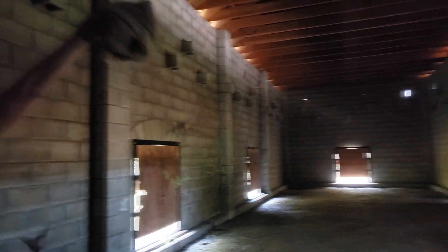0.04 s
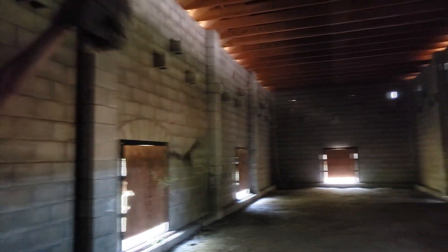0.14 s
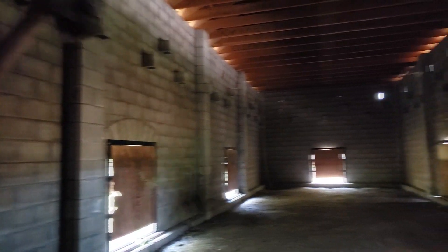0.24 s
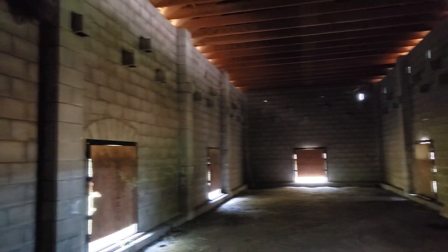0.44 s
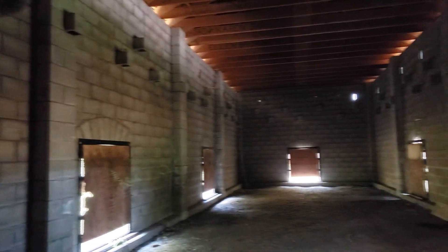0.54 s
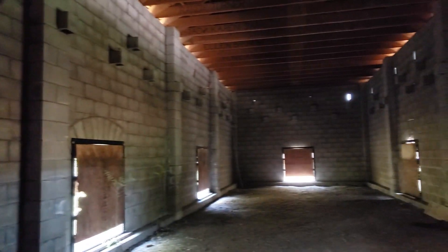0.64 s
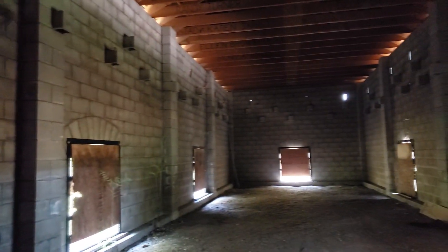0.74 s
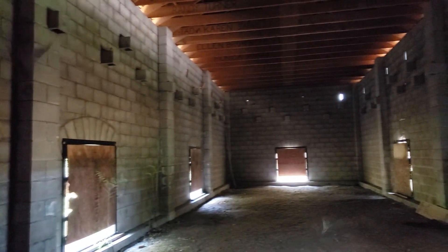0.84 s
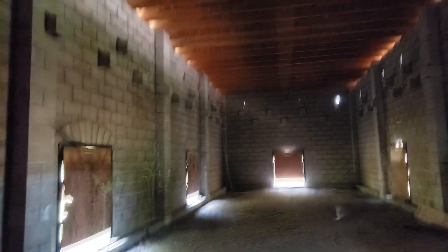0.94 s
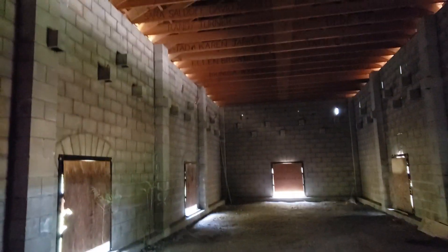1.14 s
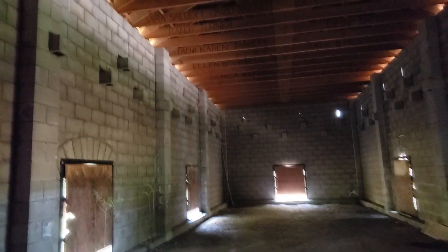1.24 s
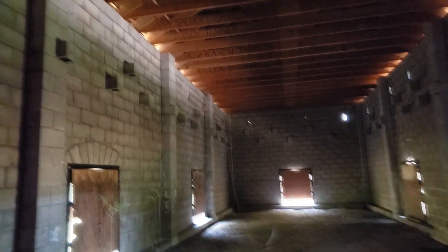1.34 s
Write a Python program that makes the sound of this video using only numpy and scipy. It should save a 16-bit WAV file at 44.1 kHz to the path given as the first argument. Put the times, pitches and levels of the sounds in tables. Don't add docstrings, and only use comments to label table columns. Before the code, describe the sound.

A bat's wings flutter right at the microphones, starting with light, dry, papery flaps and ticks. From about 0.2 to 0.6 seconds, strokes push hard, popping thumps of air into left and right, strongest on the right near 0.5, with crisp snaps. After 0.7 seconds only faint high rustles and tiny ticks remain over soft rumble and hiss, with barely any echo from the empty brick hall.

```python
import sys
import numpy as np
from scipy import signal
from scipy.fft import rfft, irfft, next_fast_len
from scipy.io import wavfile
from scipy.ndimage import uniform_filter1d, map_coordinates

SR = 44100
rng = np.random.default_rng(int(sys.argv[2]) if len(sys.argv) > 2 else 0)


def to_wav(sig):
    pcm = np.clip(np.atleast_2d(sig), -1, 1) * 32767
    pcm = np.round(pcm).astype(np.int16)
    wavfile.write(sys.argv[1], SR, pcm.T)


def invert_db(level):
    return 10 ** (np.asarray(level, dtype=float) / 20)


N = 61739


def filtered(x, response):
    size = next_fast_len(N + SR // 2)
    return irfft(rfft(x, size) * response(np.fft.rfftfreq(size, 1 / SR)), size)[..., :N]


def add(out, start_s, db, pan_db, shape):
    part = out[:, round(start_s * SR):][:, :shape.shape[-1]]
    gain = invert_db(db + np.minimum([[pan_db], [-pan_db]], 0))
    part += gain * shape[..., :part.shape[1]]


def add_turbulence(shape, t, db, t60_s, smooth):
    noise = uniform_filter1d(rng.standard_normal(900), size=smooth)
    shape[:900] += invert_db(db - 60 * abs(t[:900]) / t60_s) * noise


def puff(t, rise_s, length_s, lasts):
    jump = (1 + np.tanh(t / rise_s)) / 2
    ease = np.exp(-(np.maximum(t, 0) / length_s) ** 2)
    return jump * (lasts + (1 - lasts) * ease)


# t/s, peak/dB, left-right/dB, lasting share/1, length/ms
PUSHES = [
    (0.2245, -5, -29, 1.79, 0.69),
    (0.2904, -6.5, 38, 1.44, 1.44),
    (0.394, -19, 33, -0.3, 1.6),
    (0.4867, -1, -54, 0.089, 0.13),
    (0.489, -12.5, -40, 1.94, 1.4),
    (0.5021, -14, -45, 0.45, 0.55),
    (0.6149, -8.5, -49, 1.43, 0.66),
]
# t/s, peak/dB, left-right/dB, lasting share/1, length/ms
PULLS = [
    (0.4066, -6.5, 53, 1, 1.8),
    (0.4695, -7, -28, 0.11, 1.32),
    (0.5408, -4.5, -43, 0.91, 0.7),
    (0.5561, -13.5, -39, 0.27, 1.05),
    (.7, -32.5, 4, 0.074, 6.1),
]
GUST_DB, SHARP_S = 9, 0.00005


def gusts():
    lead_s = 0.002
    out, t = np.zeros((2, N)), np.arange(N) / SR - lead_s
    for way, rows in ((0.64, PUSHES), (-0.65, PULLS)):
        for s, db, pan_db, lasts, length_ms in rows:
            ahead = 0.0077 * puff(t + 0.00068, 0.000135, 0.00075, 0)
            add_turbulence(ahead, t, db=-31, t60_s=0.036, smooth=7)
            rise_s = SHARP_S * invert_db(1.41 * np.log1p(abs(db)))
            jump = way * puff(t, rise_s, length_ms / 1000, lasts)
            add(out, s - lead_s, db + GUST_DB, pan_db, jump - ahead)
    return out


# t/s, depth/dB, width/ms, swing-back share/1
LEFT_DIPS = [(0.018, -25, 0.63, 0.05), (0.0192, -28, 1, 0.87), (0.02, -29, 0.42, 0.38),
             (0.0374, -17.5, 0.72, 0.14), (0.0388, -22.5, 0.59, 1), (0.0881, -24.5, 0.49, 0.05),
             (0.0913, -30, 0.4, 0.69), (0.1081, -25.5, 0.61, 0.38), (0.1093, -28, 0.71, 0.88),
             (0.1104, -26.5, 0.25, 0.05), (0.1162, -25, 0.39, 0.5), (0.117, -27, 0.51, 0.38),
             (0.118, -26.5, 0.5, 0.05), (0.12, -28, 0.25, 0.05), (0.157, -28, 0.45, 0.06),
             (0.1598, -25.5, 0.48, 0.29), (0.1773, -31.0, 0.45, 0.3), (0.1789, -25.5, 0.53, 0.49),
             (0.1804, -26.5, 0.81, 0.8), (0.225, -37, 0.45, 1), (0.2268, -23.5, 0.26, 0.8),
             (0.264, -29.5, 0.51, 0.66), (0.29, -26, 0.42, 0.8), (0.3427, -22.5, 0.79, 0.57),
             (0.3441, -13, 0.32, 0.08), (0.3452, -26, 0.23, 0.8), (0.3448, -19.5, 0.29, 0.05),
             (0.3605, -22.5, 0.4, 0.13), (0.3623, -14.5, 0.45, 0.14), (0.3633, -20.5, 0.13, 0.34),
             (0.4059, -14, 0.56, 0.05), (0.4213, -45, 0.29, 0.8), (0.423, -20, 0.51, 0.46),
             (0.425, -25, 0.094, 0.98), (0.4553, -18, 0.53, 0.45), (0.5, -23, 0.79, 0.75),
             (0.5166, -21.5, 0.57, 0.66), (0.5694, -25.5, 0.29, 1), (0.6255, -21, 0.5, 0.88),
             (0.6738, -22, 0.64, 0.8), (0.6915, -39, 0.82, 0.17), (0.7106, -38.5, 0.85, 0.18),
             (0.7865, -31.5, 0.75, 0.43), (0.8027, -28, 0.67, 0.51), (0.8673, -31, 0.95, 0.47),
             (0.9435, -36.5, 1.1, 0.8), (1.1092, -35.0, 0.38, 0.81), (1.1282, -33.5, 1.1, 0.25),
             (1.1309, -37, 0.32, 0.32),
             (1.11, -39, 0.061, .05),
    (1.1296, -40, 0.073, 0.27),
    (1.1309, -42.5, 0.076, 0.33),
]
# t/s, depth/dB, width/ms, swing-back
RIGHT_DIPS = [(0.0207, -34, 0.57, 0.28), (0.0369, -28, 0.33, 0.15), (0.0383, -20, 0.43, 0.2),
              (0.067, -28.5, 0.23, 0.47), (0.0888, -39, 0.44, 0.3), (0.0893, -22.5, 0.36, 0.58),
              (0.0901, -21, 0.42, 0.046), (0.105, -33, 0.26, 0.7), (0.1067, -25, 0.32, 0.05),
              (0.108, -21.0, 0.39, 0.23), (0.1092, -23.0, 0.78, 0.21), (0.1114, -28, 0.23, 0.43),
              (0.1127, -29, 0.52, 0.05), (0.115, -25.5, 0.27, 0.55), (0.1162, -34, 0.79, 0.22),
              (0.1564, -31, 0.33, 0.11), (0.1581, -20.5, 0.47, 0.28), (0.1595, -24.5, 0.56, 0.05),
              (0.1788, -20.5, 0.52, 0.43), (0.2234, -38, 0.19, 0.27), (0.2432, -18.5, 0.62, 0.054),
              (0.2442, -17.0, 0.69, 0.05), (0.2886, -29, 0.36, 0.28), (0.2901, -12.5, 0.37, 0.46),
              (0.343, -20, 0.28, 0.97), (0.3441, -20, 0.95, 0.59), (0.3607, -15, 0.4, 0.57),
              (0.3606, -25, 0.33, 0.05), (0.3619, -16, 0.35, 0.058), (0.4046, -16.5, 0.37, 0.12),
              (0.4052, -16, 0.3, 0.17), (0.4061, -22, 0.78, 0.05), (0.4212, -13.5, 0.53, 0.24),
              (0.422, -22, 0.24, 0.18), (0.422, -26, 0.23, 0.05), (0.4238, -18.5, 0.66, 0.81),
              (0.485, -39, 0.2, 0.05), (0.539, -20.5, 0.52, 0.2), (0.5578, -23, 0.4, 0.087),
              (0.5592, -10, 0.56, 0.56), (0.6139, -19.5, 0.88, 0.05),
              (0.4802, -24, 0.2, .05),
    (.4811, -27, 0.18, .05),
    (0.4825, -29, 0.34, .05),
    (.487, -10, 0.36, .05),
    (0.4882, -10.5, 0.41, .05),
    (.5022, -25, 0.35, .05),
]
EDDY_DB, QUICK = 0.26, 0.58


def eddies():
    lead_s = 0.004
    out, t = np.zeros((2, N)), np.arange(N) / SR - lead_s
    for pan_db, rows in ((28.13, LEFT_DIPS), (-36.25, RIGHT_DIPS)):
        for s, db, width_ms, back in rows:
            width_s = np.where(t < 0, 1, QUICK) * width_ms / 1000 * 0.74
            swing = back * (1 + np.tanh(t / width_s)) / 2
            dip = swing - np.exp(-(t / width_s) ** 2)
            add_turbulence(dip, t, db=-19.5, t60_s=0.013, smooth=5)
            add(out, s - lead_s, db + EDDY_DB, pan_db, dip)
    return out


def skin_noise(length):
    shared = 0.44
    common = shared * rng.standard_normal(length)
    return common + np.sqrt(1 - shared ** 2) * rng.standard_normal((2, length))


def ring(f, centre_hz, width_hz):
    loss = 1j * f * width_hz
    return (loss / (centre_hz ** 2 - f * f + loss)) ** 2


# f/Hz, width/Hz, level/dB
PORT = [
    (10860, 4920, 6),
    (15370, 3800, 4.5),
    (3480, 2200, -12),
]
# t/s, peak/dB, left-right/dB, click share over fizz/1
SNAPS = [(0.038, -29.5, -1, 0.11), (0.091, -29.5, 3, 0.7), (0.0946, -32, -1, 0.48), (.109, -27, -2.5, .2),
         (0.1603, -30.5, 8, 0.69), (.166, -31.5, -9, 0.52), (.179, -30, 3, 0.091),
         (0.224, -25.5, -4.5, 0.44), (.262, -37, -2, 0.089), (0.2917, -27, -2, 0.96),
         (0.343, -27.5, 8, 0.3), (0.3638, -25, -5.5, 0.64), (.406, -30, 1, 0.23), (0.424, -21.5, -8.5, 1),
         (0.469, -31.5, -15, 0.37), (0.487, -24, -13, 0.69), (0.54, -26, -18, 0.2), (.556, -26, -27, 0.62),
         (0.562, -30.5, -16, 0.34), (.615, -27, -13, .3), (.628, -31, -3, 0.13), (0.675, -31.5, -14, .05)]
SNAP_DB, CLICK_S, FIZZ_S, TAIL_T60_S = 9, 0.0004, 0.0034, 0.037


def snaps():
    lead_s = 0.006
    out, t = np.zeros((2, N)), np.arange(SR // 10) / SR - lead_s
    for s, db, pan_db, click in SNAPS:
        burst = click * np.exp(-(t / CLICK_S) ** 2)
        burst += 0.14 * np.exp(-(t / FIZZ_S) ** 2)
        burst += 0.07 * (t > 0) * invert_db(-60 * t / TAIL_T60_S)
        add(out, s - lead_s, db + SNAP_DB, pan_db, burst * skin_noise(len(t)))
    return filtered(out, lambda f: sum(invert_db(db) * ring(f, c, w) for c, w, db in PORT))


# t/s, peak/dB, left-right/dB, upper-band share/1
RUSTLES = [(0.015, -40, 4, 0.37), (0.7122, -33.5, 0, 0.77), (0.7247, -44, -7, 0.73), (0.765, -42, -5, 0.43),
           (0.7842, -41, 1, 0.37), (0.828, -45.5, -14, 0.26), (0.865, -43.5, 2, 0.36),
           (0.9173, -42.5, -2, 0.21), (0.9865, -37.5, 0, 0.32), (0.9914, -43, -15, 0.66),
           (1.0448, -33, -3.5, 0.45), (1.1153, -44.5, -1.5, 0.39), (1.17, -40.5, -3, 0.26),
           (1.2223, -41, -1, 0.22), (1.2366, -38, -4, 0.56), (1.291, -43, -9, 0.33),
           (1.3087, -40, 1.0, 0.79), (1.326, -42.5, -5, 0.54), (1.361, -42, -5, 0.27)]
RUSTLE_DB, RUSTLE_T60_S, FAR_WIDTH_HZ = 11.5, 0.05, 2000


def rustles():
    lower, upper = np.zeros((2, 2, N))
    t = np.arange(SR // 10) / SR
    for s, db, pan_db, share in RUSTLES:
        grains = invert_db(4.0 * map_coordinates(rng.standard_normal(60), [t * 500]))
        grains *= invert_db(-60 * t / RUSTLE_T60_S) * (1 - np.exp(-t / 0.0016))
        add(lower, s, db + RUSTLE_DB, pan_db, (1 - share) * grains * skin_noise(len(t)))
        add(upper, s, db + RUSTLE_DB + 0.5, pan_db, share * grains * skin_noise(len(t)))
    low_ring = filtered(lower, lambda f: ring(f, PORT[0][0], FAR_WIDTH_HZ))
    return low_ring + filtered(upper, lambda f: ring(f, PORT[1][0], FAR_WIDTH_HZ))


def wing_skin():
    lag_s = np.array([[0.00005], [0]])
    return filtered(snaps() + rustles(), lambda f: np.exp(-2j * np.pi * f * lag_s))


def hall(x):
    t60_s, delay = 0.086, 130
    t = np.arange(SR // 3) / SR
    tail = rng.standard_normal((2, len(t))) * invert_db(-60 * t / t60_s)
    tail /= np.linalg.norm(tail[0])
    late = np.pad(x.mean(0), (delay, 0))[None]
    return signal.fftconvolve(late, tail, axes=1)[:, :N]


def coloured(spectrum, alike):
    f, db = np.transpose(spectrum)
    white = rng.standard_normal((2, N))
    a, b = filtered(white, lambda hz: invert_db(np.interp(np.log(hz + 1), np.log(f), db)))
    angle = np.arccos(alike) / 2
    mid, side = np.cos(angle) * a, np.sin(angle) * b
    x = np.array([mid + side, mid - side])
    return x / np.sqrt(np.mean(x ** 2) + 1e-20)


def wobble(rate_hz):
    knots = rng.standard_normal(int(N * rate_hz / SR) + 4)
    return map_coordinates(knots, [np.arange(N) * rate_hz / SR])


# t/s, level/dB
NEAR = [(0.0, -46.5), (0.05, -40), (0.13, -41.5), (0.268, -46), (0.408, -42.5), (0.458, -40),
        (0.552, -45.5), (0.68, -51), (0.72, -59), (1.09, -61), (1.27, -60.5), (1.4, -61.5)]
# f/Hz, density/dB
RUMBLE = [(18, -10), (30, 6.5), (231, -8), (286, -9.5), (397, -17), (809, -18.5), (3000, -32),
          (3900, -43.5), (6600, -120)]
# f/Hz, density/dB
HISS = [(880, -66), (1500, -15.5), (2680, -15.5), (5930, -15.5), (8680, -8.5), (10400, -1.5), (12100, -6.5),
        (15200, -3), (16500, -14.5)]
GUSTY_DB, HISS_DB, HISS_FOLLOWS = 2.2, -59.5, 0.46


def air():
    near_db = np.interp(np.arange(N) / SR, *np.transpose(NEAR))
    port_gusts_db = GUSTY_DB * np.array([wobble(40), wobble(54.75)])
    rumble = invert_db(near_db + 2.0 + port_gusts_db) * coloured(RUMBLE, 0.37)
    low = coloured([(30, -3.0), (70, -6.5), (130, -3.5), (300, -38.5)], 0.94)
    low *= invert_db(near_db - 6 + GUSTY_DB * wobble(16.0))
    hiss_db = HISS_DB + HISS_FOLLOWS * (near_db - near_db.min()) + 1.6 * wobble(29.9)
    return rumble + low + invert_db(hiss_db) * coloured(HISS, 0.033)


def scene():
    wing = wing_skin()
    echo_db = -44
    return gusts() + eddies() + wing + invert_db(echo_db) * hall(wing) + air()


def top_cut(x):
    return signal.sosfilt(signal.butter(12, 17150, fs=SR, output="sos"), x)


def record(dry):
    low_cut_hz, top_hz, over_top_db = 50.6, 15950, -30
    x = signal.sosfilt(signal.butter(4, low_cut_hz, "high", fs=SR, output="sos"), dry)
    x = filtered(x, lambda hz: np.where(hz < top_hz, 1, invert_db(over_top_db)))
    x = x / (1 + np.abs(x) ** 12) ** (1 / 12)
    return top_cut(x)


dry = scene()
out = record(dry)
to_wav(out)
```